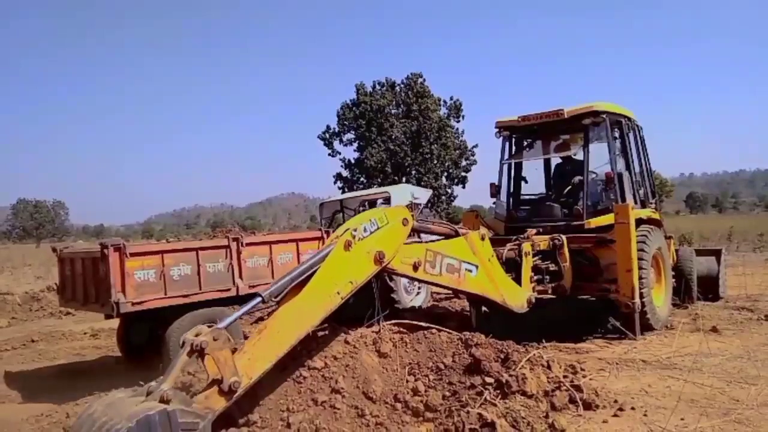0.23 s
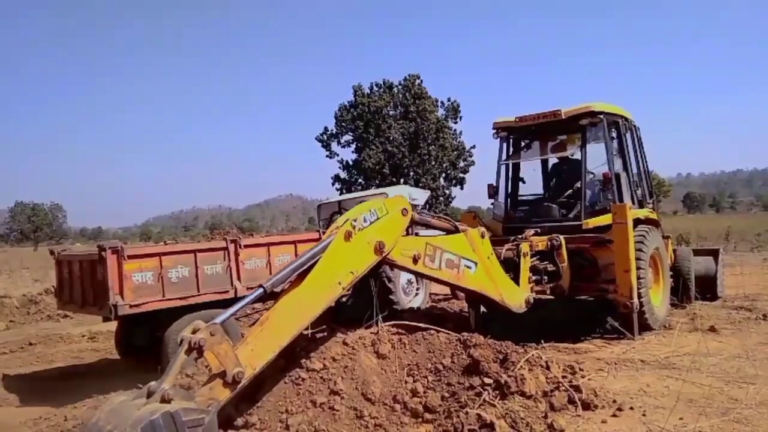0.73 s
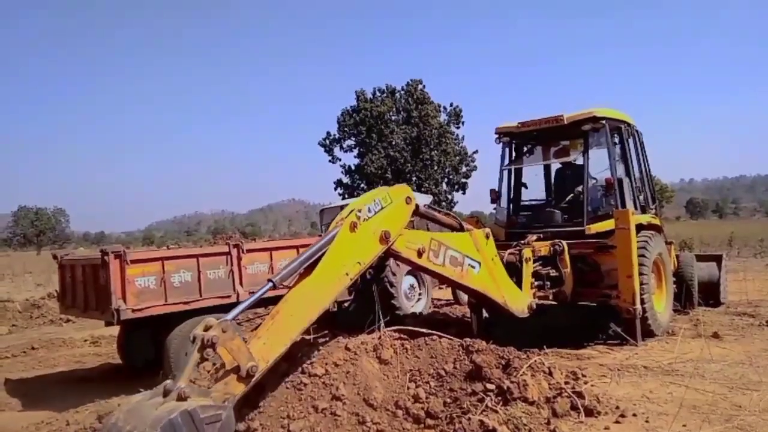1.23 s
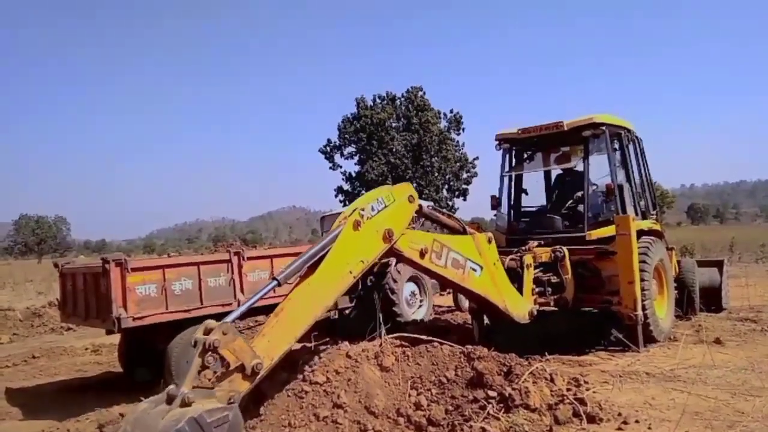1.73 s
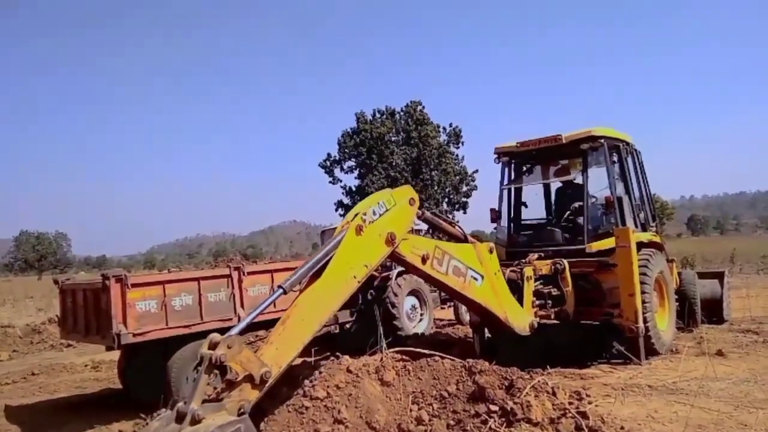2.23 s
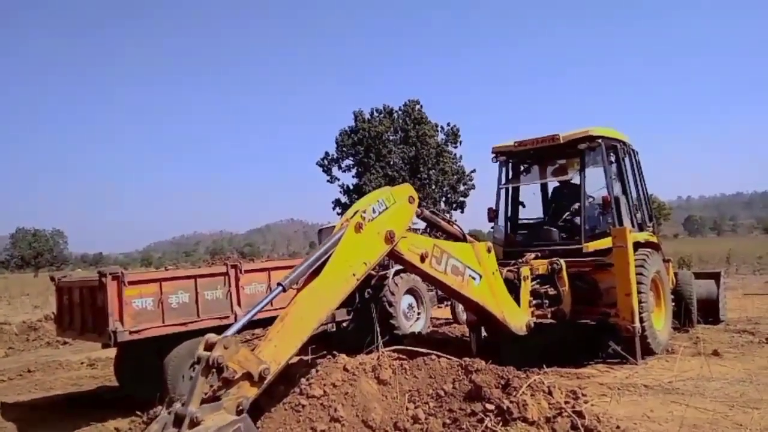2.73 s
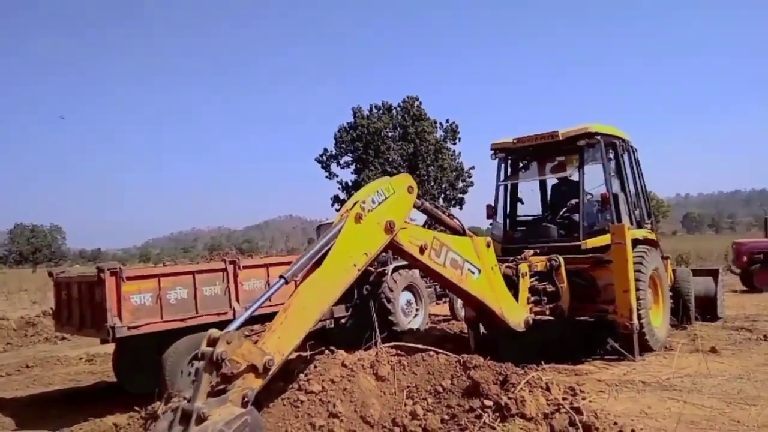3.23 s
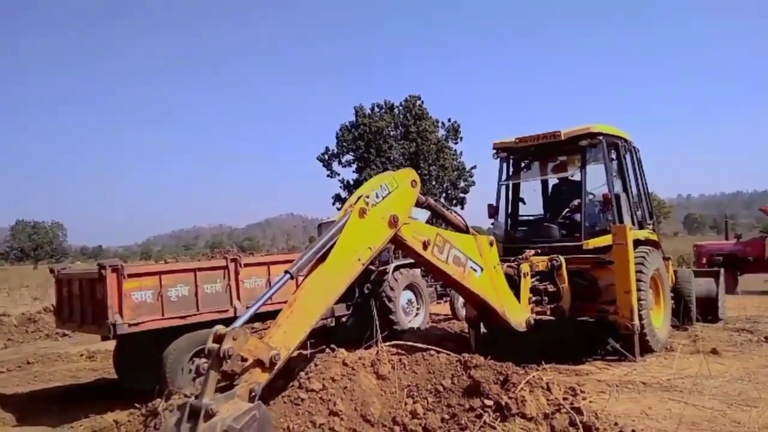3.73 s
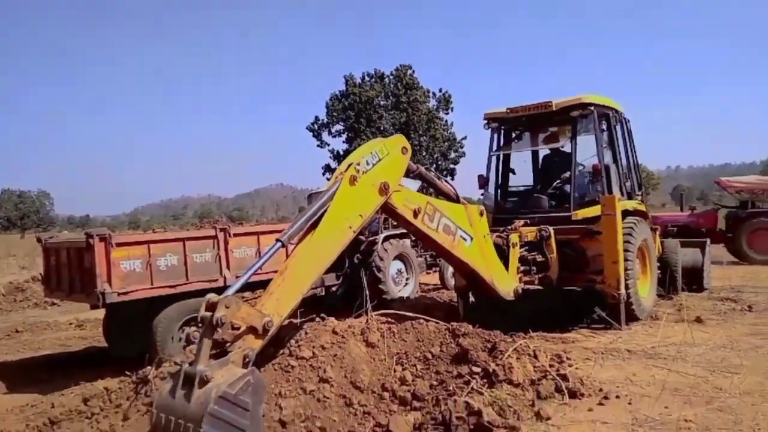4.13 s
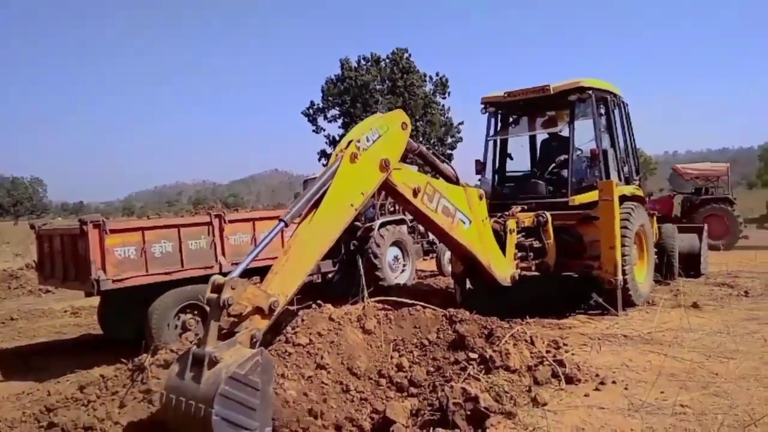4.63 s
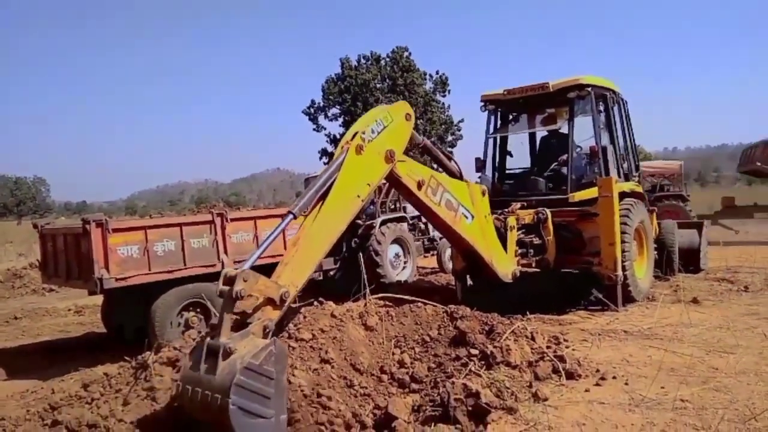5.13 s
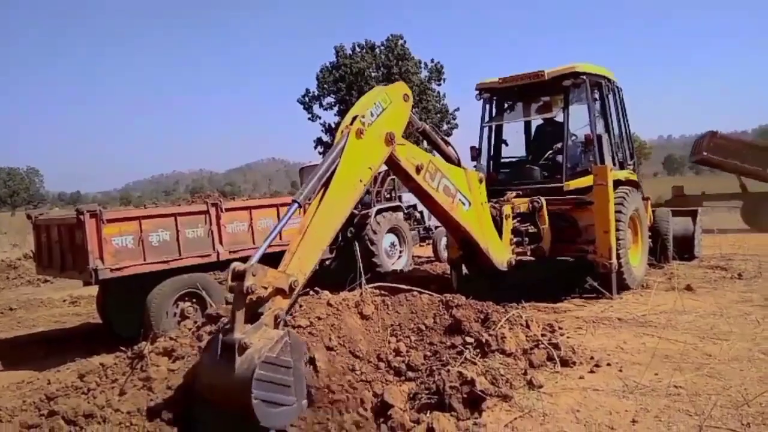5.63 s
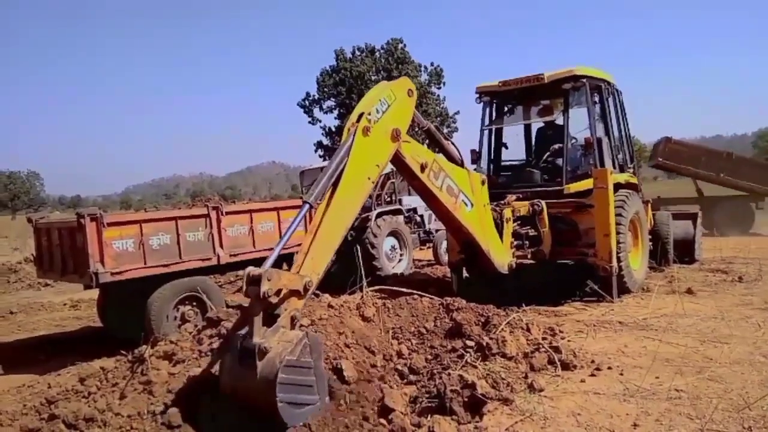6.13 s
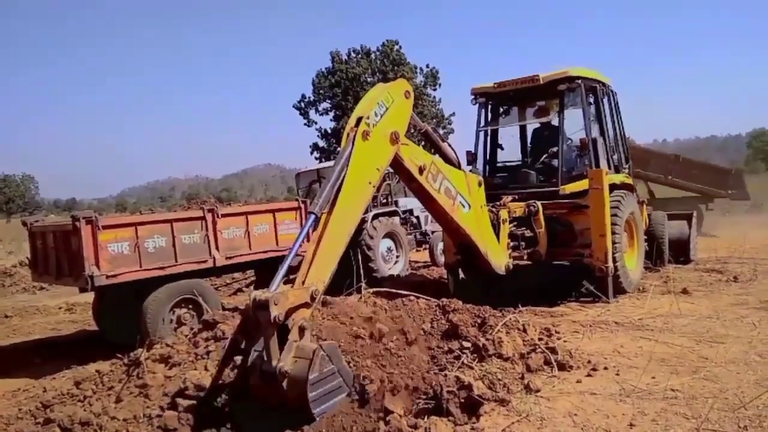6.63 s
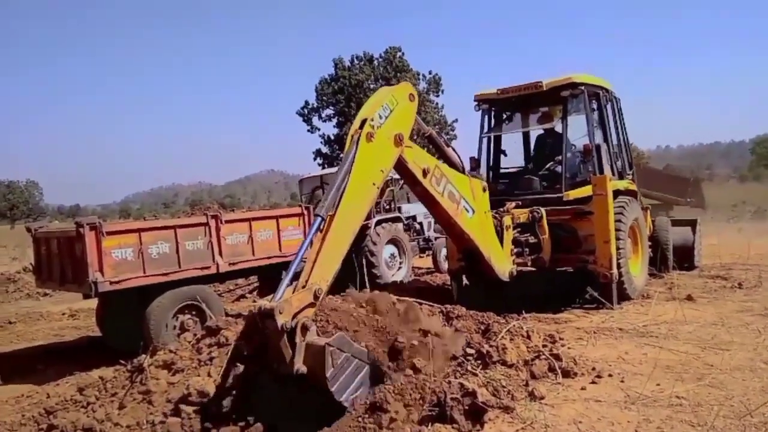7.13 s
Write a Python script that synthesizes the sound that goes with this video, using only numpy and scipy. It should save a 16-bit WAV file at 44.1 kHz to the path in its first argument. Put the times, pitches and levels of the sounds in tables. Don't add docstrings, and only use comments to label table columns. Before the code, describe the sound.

A backhoe's diesel throbs and rattles outdoors while its bucket drags stony soil, with sharp cracks, heavy thuds and metallic groans, then mostly engine.

```python
import sys
import numpy as np
from scipy import signal
from scipy.fft import rfft, irfft, next_fast_len
from scipy.io import wavfile
from scipy.ndimage import uniform_filter1d

SR = 44100
rng = np.random.default_rng(int(sys.argv[2]) if len(sys.argv) > 2 else 0)


def transcribe(signal):
    frames = np.atleast_2d(signal).T
    limited = np.clip(frames, -1, 1)
    pcm = np.round(limited * 32767).astype(np.int16)
    wavfile.write(sys.argv[1], SR, pcm)


def volts_from_decibels(level):
    exponent = np.asarray(level, float) / 20
    return 10 ** exponent


N = 325017
T = np.arange(N) / SR

# (time [s], level [dB])
STRAIN = [(.4, -3), (.65, 3), (1.08, -3), (1.6, -2), (1.8, 6.5), (1.93, 19.5), (2.22, 19), (2.6, -0.5),
          (3.0, 23.5), (3.17, 16), (3.5, 5.5), (4.6, -1), (5.0, 2.5), (5.25, -1.5), (6.38, 1), (6.57, 9),
          (6.73, -5.5), (7.37, 0.5)]
# (frequency [Hz], density [dB per Hz])
GRIT_SPECTRUM = [(2060, -31.5), (3500, -10.5), (3800, 7.5), (5160, -7), (5540, -7), (5900, -6),
                 (6460, -3.5), (8410, -14), (11000, -17), (14300, -45.5), (22000, -120)]


def unit(x):
    return x / np.sqrt(np.mean(x ** 2))


def curves(table):
    s, *columns = np.transpose(table)
    return [np.interp(T, s, c) for c in columns]


def colour(x, points):
    hz, db = np.transpose(points)
    size = next_fast_len(len(x))
    log_f = np.log(np.fft.rfftfreq(size, 1 / SR) + 1)
    gain_db = np.interp(log_f, np.log(hz), db, left=-90, right=-90)
    return unit(irfft(rfft(x, size) * volts_from_decibels(gain_db), size)[:len(x)])


def ring(x, hz, width_hz):
    return signal.lfilter(*signal.iirpeak(hz, hz / width_hz, fs=SR), x)


def ring_twice(x, hz, width_hz, second_width_hz=None):
    return ring(ring(x, hz, width_hz), hz, second_width_hz or width_hz)


def walk(rate_hz):
    k = int(SR / rate_hz)
    steps = np.repeat(rng.standard_normal(N // k + 1), k)
    return 1.293 * uniform_filter1d(uniform_filter1d(steps, k), k)[:N]


def drift(x):
    return np.interp(T + np.cumsum(0.009 * walk(5)) / SR, T, x)


def grains(rate_hz, spread_db, tail_s):
    size = (rng.random(N) < rate_hz / SR) * volts_from_decibels(spread_db * rng.exponential(size=N))
    power = signal.lfilter([1], [1, -np.exp(-1 / (tail_s * SR))], size ** 2)
    return rng.standard_normal(N) * np.sqrt(power)


def swells(table, rise_s, t60_s):
    total = np.zeros(N)
    for s, hold_s, db in table:
        fade_db = 60 * np.clip(T - s - hold_s, 0, 9) / t60_s
        total += volts_from_decibels(db - fade_db) * np.clip((T - s) / rise_s + .5, 0, 1) ** 2
    return total


def add(out, s, sound):
    i = int(s * SR)
    out[i:i + len(sound)] += sound[:N - i]


def burst(carrier, s, db, t60_s, rise_s):
    part = carrier[int(s * SR):int((s + .5) * SR)]
    t = T[:len(part)]
    return volts_from_decibels(db) * part * (1 - np.exp(-t / rise_s)) * volts_from_decibels(-60 * t / np.clip(t60_s, .02, .6))


def diesel():
    # (time [s], firing rate [Hz], exhaust level [dB])
    engine = [(.3, 50.2, -40.5), (1.0, 50.34, -40), (1.6, 50.27, -37), (2.0, 48.76, -39.5),
              (2.3, 47.8, -37), (3.0, 47.31, -29), (3.7, 47.5, -31.5), (5.2, 47.66, -32.5),
              (5.9, 48.12, -34.5), (6.75, 48.35, -33), (6.98, 48.77, -41), (7.15, 48.57, -36.5),
              (7.37, 48.3, -33)]
    firing_hz, exhaust_db = curves(engine)
    turns = np.cumsum(firing_hz * (1 + 0.01198 * walk(12))) / SR
    count = turns.astype(int)
    cylinder = np.arange(N // 100)
    strength_db = 2.5 * rng.standard_normal(N // 100) + (-1.) ** cylinder
    strength = volts_from_decibels(strength_db)[count]
    pipe = exhaust(np.diff(count, prepend=0) * strength)
    low = volts_from_decibels(exhaust_db + 3.5) * (unit(pipe) + tractor(pipe))
    return low + block(turns, strength) + rumble() + pump(turns)


def exhaust(pulses):
    # (frequency [Hz], width [Hz], level [dB])
    pipe_modes = [(48.3, 12.2, -3.5), (97.4, 22, 1), (139.6, 20.2, -4), (248, 18, -21), (291, 65, -21.5)]
    out = np.zeros(N)
    for k, (hz, width_hz, db) in enumerate(pipe_modes):
        out -= (-1) ** k * volts_from_decibels(db) * ring_twice(pulses, hz, width_hz, 2 * width_hz) / np.sqrt(width_hz)
    return out


def block(turns, strength):
    # (frequency [Hz], width [Hz], level [dB])
    panels = [(918, 62, -8.5), (1216, 70, 2), (1336, 160, -15.5), (1786, 87, -4), (2483, 55, -15.5),
              (2770, 200, -9), (3118, 43, -14), (3626, 72, -22), (4337, 90, -31)]
    # (frequency [Hz], density [dB per Hz])
    casing = [(600, -20), (900, 0), (1500, -4), (2200, -9), (3300, -13), (4300, -27), (5500, -45)]
    puff = .4 + strength * np.exp(-(turns % 1) / .4)
    knock = puff * rng.standard_normal(N)
    rattle = volts_from_decibels(-11) * colour(knock, casing)
    for hz, width_hz, db in panels:
        buzz = volts_from_decibels(3.2 * walk(16))
        rattle += volts_from_decibels(db) * buzz * drift(unit(ring_twice(knock, hz, width_hz, 2 * width_hz)))
    shield_db = 8.5 * np.clip(T - 6.24, 0, 9)
    rattle_db = -59 + 0.49 * curves(STRAIN)[0] - shield_db
    return volts_from_decibels(rattle_db - 1.5) * rattle


def rumble():
    # (frequency [Hz], density [dB per Hz])
    spectrum = [(4.7, -59.5), (8.0, -25.5), (21, -18), (25, -11), (37, -6.5), (97, 1), (177, -8),
                (303, -8.5), (386, -18.5), (500, -42.5), (650, -56.5), (1100, -120)]
    rumble_db = -41.5 + 0.33 * curves(STRAIN)[0]
    return volts_from_decibels(rumble_db + 4.5 + 2.0 * walk(30)) * colour(rng.standard_normal(N), spectrum)


def pump(turns):
    # (multiple of the firing rate [1], level [dB])
    orders = [(5.15, -49.5), (6.0, -47.5), (1.38, -45)]
    return sum(volts_from_decibels(db + 2.2 * walk(5)) * np.sin(2 * np.pi * order * turns) for order, db in orders)


def soil():
    # (time [s], level [dB])
    drag = [(.4, -59), (.9, -53), (1.2, -56), (1.6, -48.5), (2.07, -39.5), (2.26, -47), (2.5, -50),
            (2.87, -50), (2.99, -40), (3.3, -54), (3.55, -53.5), (4.62, -58.5), (4.88, -93)]
    # (time [s], length [s], level [dB])
    slides = [
        (5.05, .18, -58),
        (5.93, 0.096, -60),
        (6.6, 0.23, -54.5),
    ]
    # (frequency [Hz], density [dB per Hz])
    scrape = [(590, -35.5), (1000, -31), (1170, -16.5), (1270, 0), (1520, -9), (1780, 7), (2160, -9),
              (2490, 3.5), (3500, -13), (3870, -14.5), (4800, -35.5), (6240, -64.5), (10600, -120)]
    flow = volts_from_decibels(curves(drag)[0]) + swells(slides, rise_s=0.044, t60_s=0.4)
    flow_db = 20 * np.log10(flow)
    grit_db = -71 + 1.43 * (flow_db + 51)
    rush = volts_from_decibels(flow_db - 2.5) * colour(grains(1300, 1.7, 0.013), scrape)
    return rush + volts_from_decibels(grit_db) * colour(grains(900, 1.9, 0.0078), GRIT_SPECTRUM)


def stones():
    # (time [s], dull crack [dB], bright crack [dB], grit spray [dB])
    knocks = [(.46, -43, -53, -78), (.5192, -39.5, -53, -56), (.8185, -42, -43.5, -60),
              (1.525, -35, -39.5, -55), (1.6414, -36, -49, -60), (1.8008, -25, -39, -63),
              (1.89, -22.5, -29, -47), (1.9694, -29, -40, -44), (2.149, -21, -32.5, -57),
              (2.164, -27, -34, -42.5), (2.342, -31.5, -55, -66), (2.411, -34, -38.5, -56),
              (2.463, -29, -45, -55), (2.5227, -24.5, -32, -52), (2.6602, -31.5, -41, -44.5),
              (2.8075, -31.5, -41.5, -47), (2.9189, -25, -40, -75), (2.9682, -26, -42.5, -47.5),
              (3.0305, -23, -38, -61), (3.2635, -21, -35.5, -68), (3.55, -34, -40, -57.5),
              (3.6524, -28, -42, -49.5), (4.0542, -39, -42, -61.5), (4.116, -24, -38, -44),
              (4.4264, -32.5, -40.5, -69), (5.0795, -31, -42, -87), (5.1153, -35.5, -52, -83),
              (6.4572, -25, -37.5, -71), (6.5526, -37, -48.5, -95), (6.636, -32.5, -42.5, -46.5)]
    # (time [s], bright crack [dB])
    pebbles = [
        (.2244, -55.5),
        (3.3833, -47),
        (3.6754, -41.5),
        (3.8582, -59),
        (4.289, -49),
        (4.797, -59),
        (5.306, -57),
        (6.696, -42),
        (7.3552, -66),
    ]
    # (time [s], level [dB], frequency [Hz])
    ram_taps = [
        (5.3065, -57, 4350),
        (5.3065, -56, 3250),
        (5.642, -49, 3100),
        (5.641, -58.5, 4080),
        (7.18, -72, 10660),
    ]
    # (time [s], level [dB])
    contacts = [(0.2257, -44), (0.3549, -42), (0.4616, -44), (0.519, -42), (0.8193, -38), (1.0019, -44),
                (1.0383, -42), (1.1082, -44), (1.2189, -46), (1.4599, -43), (1.5232, -36), (1.8909, -19),
                (1.9164, -29), (2.1488, -23), (2.1643, -20), (2.3426, -36), (2.4102, -30), (2.4636, -29),
                (2.509, -26), (2.5229, -20), (2.6599, -35), (2.8068, -35), (2.9154, -30), (3.2418, -41),
                (3.2648, -31), (3.382, -36), (3.4808, -39), (3.5536, -36), (3.6529, -34), (3.6753, -30),
                (3.7581, -41), (3.8581, -45), (3.9911, -42), (4.0545, -37), (4.1178, -31), (4.2889, -42),
                (4.4276, -38), (5.0801, -34), (5.1153, -37), (6.4565, -29), (6.5538, -41)]
    # (frequency [Hz], density [dB per Hz])
    contact_spectrum = [(700, -24), (1300, 3), (3200, 1), (3700, -25), (6000, -45), (9000, -70)]
    dull_spectrum = [(600, -30.5), (1050, -5.5), (1900, -2.5), (2400, -32)]
    bright_spectrum = [(1600, -31.5), (2100, 2), (3400, -0.5), (3900, -26)]
    out = np.zeros(N)
    stone = grains(600, 2.6, 0.0025)
    white, spray = unit(stone), colour(stone, GRIT_SPECTRUM)
    dull, bright = colour(stone, dull_spectrum), colour(stone, bright_spectrum)
    hits = knocks + [(s, db - 1, db, db - 21) for s, db in pebbles]
    spots = np.sin(np.arange(len(hits)) ** 2)
    t60_s = 0.29
    for (s, dull_db, bright_db, spray_db), spot in zip(hits, spots):
        strike = burst(white, s, bright_db + 6, 1.8 * t60_s, 0.0017)
        add(out, s, ring_twice(strike, 2590 + 160 * spot, 350))
        add(out, s, burst(dull, s, dull_db - 12.5, t60_s, 0.0036))
        add(out, s, burst(bright, s, bright_db - 3.5, 0.68 * t60_s, 0.00045))
        add(out, s, burst(spray, s, spray_db + 0.5, 1.04 * t60_s, 0.0011))
    contact = colour(rng.standard_normal(N), contact_spectrum)
    for s, db in contacts:
        add(out, s, burst(contact, s, db - 4, 0.026, 0.00035))
    for s, db, hz in ram_taps:
        add(out, s, ring_twice(burst(white, s, db + 12, 0.21, .001), hz, 600))
    return out


def clods():
    # (time [s], level [dB], frequency [Hz], t60 [s])
    thuds = [(0.421, -22.5, 98, 0.16), (0.533, -22.5, 106.9, 0.21), (.635, -27, 295, 0.3),
             (.53, -27, 240, .15), (.558, -32, 350, .12), (.9, -29, 260, .15), (.94, -30, 300, .1),
             (1.645, -28, 200, .12), (2.73, -30, 340, .1), (3.065, -26, 360, .12), (0.869, -30, 330, 0.23),
             (3.018, -22, 275, 0.22), (2.72, -33, 400, .15), (3.415, -31, 372, 0.094),
             (3.66, -28.5, 383, 0.13), (1.855, -27.5, 266.5, .2), (0.779, -23.5, 121, 0.14),
             (0.859, -22, 80, 0.25), (0.917, -12.5, 102.7, 0.096), (1.52, -15, 84, 0.096),
             (1.655, -20.5, 135, 0.15), (1.839, -17, 88.5, 0.069), (1.894, -16.5, 96, 0.15),
             (2.24, -15, 148, 0.089), (2.676, -18, 104.6, 0.17), (2.849, -12, 87.5, 0.087),
             (2.94, -12.5, 102.5, 0.3), (2.969, -10, 160, 0.099), (3.014, -8.5, 166, 0.11),
             (3.06, -12.5, 85, 0.082), (3.256, -14, 127, 0.11), (3.599, -22.5, 91, 0.14),
             (5.217, -12, 83.4, 0.061), (6.489, -25, 90, 0.12)]
    out, t = np.zeros(N), T[:SR // 2]
    for s, db, hz, t60_s in thuds:
        wave = np.sin(2 * np.pi * hz * t) + 0.27 * (hz < 200) * np.sin(2 * np.pi * 2.3 * hz * t)
        fade_db = 60 * t / np.clip(t60_s, .03, .5)
        add(out, s, volts_from_decibels(db + 2 - fade_db) * wave * (1 - np.exp(-t / 0.0059)))
    return out


def groans():
    # (time [s], level [dB], frequency [Hz], held [s])
    rings = [(.222, -47, 574, .03), (.268, -41.5, 615, 0.042), (.325, -44, 641, .03),
             (.352, -41.5, 699, 0.018), (.40, -48.5, 637, 0.066), (.5, -38, 553, 0.037),
             (.535, -39.5, 637, .03), (.638, -34, 548, .03), (.645, -39, 640, .02),
             (.696, -40.5, 605, 0.044), (1.4, -41, 612, .03), (1.5, -43.5, 631, 0.068),
             (1.652, -41, 734, .09), (1.838, -36.5, 622, 0.035), (1.878, -31.5, 613, .05),
             (2.156, -26, 743, .018), (2.312, -39.5, 519, 0.021), (2.486, -44.5, 745, .02),
             (2.527, -28, 744, .032), (2.648, -34.5, 519, 0.032), (2.7, -37.5, 533, .02),
             (2.825, -35, 544, 0.034), (2.88, -36, 499, 0.018), (2.912, -35, 610, .02),
             (2.955, -34.5, 743, .04), (3.03, -31, 452, .02), (3.1, -34, 519, 0.046),
             (3.27, -34.5, 650, 0.028), (3.588, -41, 546, .02), (3.75, -39.5, 545, .03),
             (3.85, -38, 520, 0.029), (4.058, -47, 568, .02), (4.106, -31.5, 562, 0.033),
             (4.15, -35.5, 515, 0.057), (4.222, -43, 543, 0.0092), (4.27, -45, 567, 0.038),
             (4.318, -42.5, 514, 0.0091), (4.34, -36, 430, 0.022), (4.365, -37.5, 510, 0.021),
             (4.39, -37, 549, .05), (4.791, -45, 535, 0.021), (4.934, -44.5, 557, .03),
             (5.112, -33.5, 551, .03), (5.658, -46, 570, .01), (6.451, -34, 509, 0.014),
             (6.465, -39, 730, 0.021), (6.551, -34.5, 575, 0.036), (6.624, -36.5, 506, .04),
             (6.68, -40.5, 485, .045), (7.196, -38, 525, .02), (7.32, -43, 540, .015),
             (3.652, -38, 440, .02), (.917, -46, 530, .02)]
    out, t = np.zeros(N), T[:SR // 2]
    noise = rng.standard_normal(N + SR)
    for (s, db, hz, held_s), bend in zip(rings, rng.random(len(rings))):
        tone = np.sin(2 * np.pi * hz * (t + (bend - .4) * t ** 2))
        rasp = unit(ring_twice(noise[int(s * SR):][:len(t)], hz, 140))
        fade_db = 60 * np.clip(t - held_s, 0, 1) / .085 + 70 * t
        add(out, s, volts_from_decibels(db + 2.5 - fade_db) * (.72 * tone + .4 * rasp) * (1 - np.exp(-t / .005)))
    return out


def loose_plates():
    # (frequency [Hz], width [Hz], level [dB])
    plate_modes = [(434, 90, 0.5), (523, 84, 3), (613.5, 49, -4.5), (752, 35, -9.5), (900, 200, -17.5)]
    # (time [s], level [dB])
    clinks = [(.85, -45.5), (3.35, -35), (3.87, -34.5), (4.13, -42), (4.215, -39.5), (4.43, -52.5),
              (4.505, -43.5), (4.68, -44.5), (4.77, -50), (4.85, -42.5), (4.9, -44.5), (4.955, -43),
              (5.065, -46), (5.37, -49), (5.6, -54.5), (6.2, -46.5)]
    clatter = np.zeros(N)
    for hz, width_hz, db in plate_modes:
        clatter += volts_from_decibels(db) * unit(ring_twice(grains(30, 2.2, .015), hz, width_hz))
    out = volts_from_decibels(-61 + curves(STRAIN)[0] + 1.5) * unit(clatter)
    plate = unit(ring_twice(rng.standard_normal(N + SR), 924, 110))
    for s, db in clinks:
        add(out, s, burst(plate, s, db - 2.5, 0.13, .006))
    return out


def valve():
    # (time [s], length [s], hiss level [dB])
    strokes = [
        (1.05, 0.66, -82),
        (1.78, 0.33, -70.5),
        (2.2, 0.26, -78),
        (2.84, 0.22, -65.5),
        (3.62, 0.23, -71),
        (4.33, .14, -70.5),
        (4.97, 0.12, -74.5),
        (5.85, 0.097, -80),
    ]
    # (frequency [Hz], density [dB per Hz])
    hiss = [(4120, -30.5), (7000, -4), (7740, -11.5), (8310, -8), (8970, -12.5), (10800, 0.5), (11300, -1),
            (12300, -4), (13300, 3.5), (14800, -4.5), (15600, -5)]
    # (frequency [Hz], width [Hz], level [dB])
    whistle = [(7260, 80, -83.5), (8110, 80, -84.5), (10900, 120, -78), (12200, 100, -93)]
    fading = np.interp(T, [4.4, 5.3], [1, .3])
    flow = swells(strokes, rise_s=0.12, t60_s=0.28) + volts_from_decibels(-86) * fading
    out = flow * volts_from_decibels(7.0 + 2 * walk(23)) * colour(rng.standard_normal(N), hiss)
    noise = rng.standard_normal(N)
    for hz, width_hz, db in whistle:
        out += fading * volts_from_decibels(db + 3.6 * walk(16)) * unit(ring_twice(noise, hz, width_hz))
    return out


def link_and_pins():
    # (centre [s], width [s], level [dB])
    chatter = [
        (.53, 0.046, -58.5),
        (.8, 0.092, -67),
        (1.045, 0.065, -43),
        (1.3, 0.065, -46.5),
    ]
    # (time [s], level [dB], level near 10 kHz [dB], t60 [s])
    pins = [(0.4988, -64.5, -79, 0.13), (1.708, -56, -51, 0.15), (2.1604, -56, -42, 0.17),
            (2.421, -63.5, -49, 0.29), (2.811, -53, -62, 0.23), (4.2392, -52.5, -53.5, 0.16),
            (4.5351, -51.5, -74, 0.084), (4.8404, -65, -70, 0.11), (5.144, -57.5, -61, 0.1),
            (5.3826, -62.5, -57, 0.21), (5.4585, -54.5, -100, 0.14), (5.5027, -49, -88, 0.071),
            (6.128, -52, -62.5, 0.092), (6.263, -63, -62.5, 0.11), (6.4732, -63.5, -88, 0.11),
            (6.61, -41.5, -49.5, 0.087), (6.6822, -52, -66, 0.18)]
    out = np.zeros(N)
    noise = rng.standard_normal(N)
    link = unit(ring_twice(noise, 10600, 1500, 1800))
    pin = unit(ring_twice(noise, 14100, 500, 1000))
    spread = unit(ring(noise, 6850, 1100) + ring(noise, 14300, 1200))
    for s in 1.0397 + .0353 * np.arange(-20, 9):
        db = max(top_db - 6 * ((s - centre_s) / width_s) ** 2 for centre_s, width_s, top_db in chatter)
        add(out, s, burst(link + .5 * spread, s, db - 0.5, 0.05, 0.0008))
    for s, db, low_db, t60_s in pins:
        add(out, s, burst(pin, s, db - 1.0, t60_s, .0008))
        add(out, s, burst(link, s, low_db - 5.0, 0.051, .0008))
    return out


def tractor(pipe):
    # (time [s], phase [cycles])
    beats = [
        (0, -22),
        (3.9, 0),
        (4.61, 4),
        (5.36, 8),
        (6.2, 12),
        (7.4, 18),
    ]
    order = ring_twice(pipe, 144, 12)
    third = np.angle(signal.hilbert(order, next_fast_len(N))[:N])
    return volts_from_decibels(-9 + 1.9 * walk(3)) * np.cos(third + 2 * np.pi * (curves(beats)[0] + .5))


def scene():
    machine = diesel() + soil() + stones() + clods() + groans() + loose_plates()
    near = volts_from_decibels(6.0) * (machine + valve() + link_and_pins())
    return np.array([near, 0 * near])


def patchy_treble(x):
    depth_db, patchy_db, quiet_db = 22, 2.5, -108
    f, _, z = signal.stft(x, SR, nperseg=1024)
    field = rng.standard_normal(z.shape)
    field = uniform_filter1d(uniform_filter1d(field, size=4, axis=0), size=13, axis=1)
    field = field / field.std()
    power = uniform_filter1d(uniform_filter1d(np.abs(z) ** 2, size=9, axis=0), size=3, axis=1)
    faint = (quiet_db + 26 * (f[:, None] > 14200) - 10 * np.log10(power + 1e-20)) / 6
    treble = np.clip(np.log2(f / 1000 + 1e-9) / 3, 0, 1)[:, None]
    margin = field + 1.92 - 5 * 0.31 * treble - np.clip(faint, 0, 4)
    dropped = 1 / (1 + np.exp(np.clip(4 * margin, -30, 30)))
    gain_db = treble * (patchy_db * field - depth_db * dropped)
    return signal.istft(z * volts_from_decibels(gain_db), SR, nperseg=1024)[1][:N]


def band_limit(x):
    return signal.sosfilt(signal.butter(12, 15500, fs=SR, output="sos"), x)


def record(dry):
    # (frequency [Hz], density [dB per Hz])
    settle = [(60, -4), (200, 5.5), (1200, -1.5), (4500, -23), (6000, -49)]
    opening = np.interp(T, [.118, .125, .21, .24, .4], [0, .03, .1, .6, 1])
    rustle = np.interp(T, [.118, .125, .21, .24, .36], [0.002, 0.3, 0.56, 2.5, 0])
    rustle = rustle * colour(rng.standard_normal(N), settle)
    left = patchy_treble(dry[0] * opening + volts_from_decibels(-51) * rustle)
    return band_limit(np.array([left, dry[1]]))


dry = scene()
out = record(dry)
transcribe(out)
```